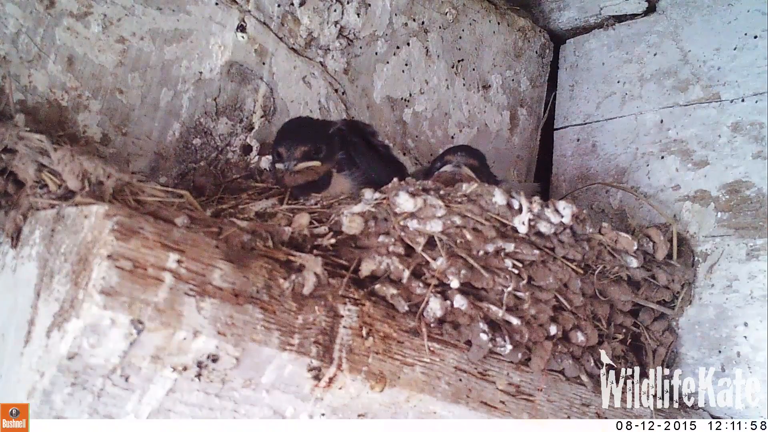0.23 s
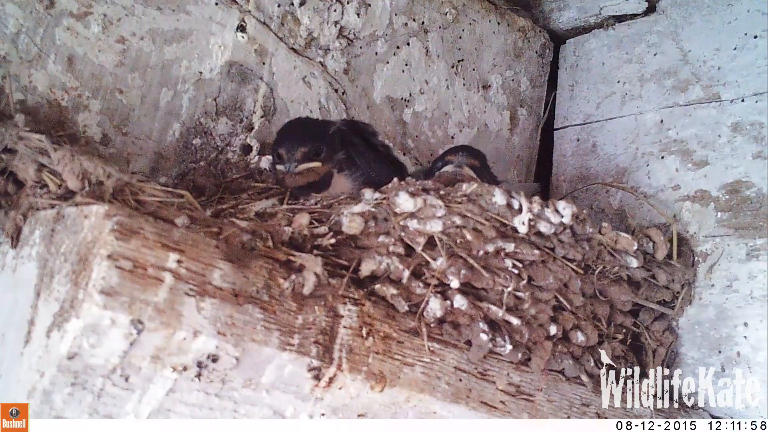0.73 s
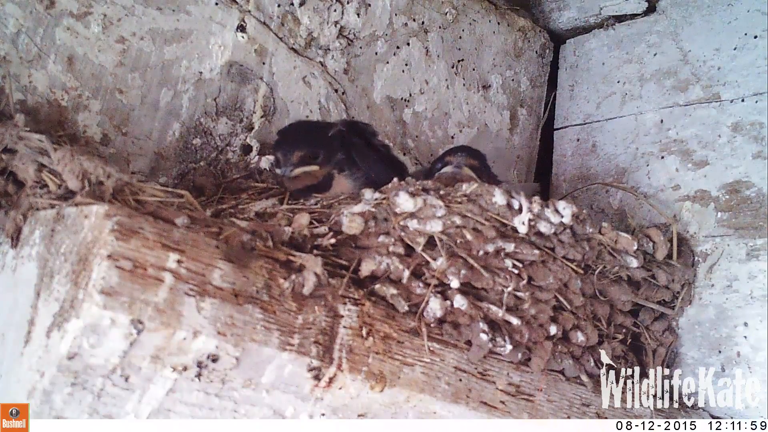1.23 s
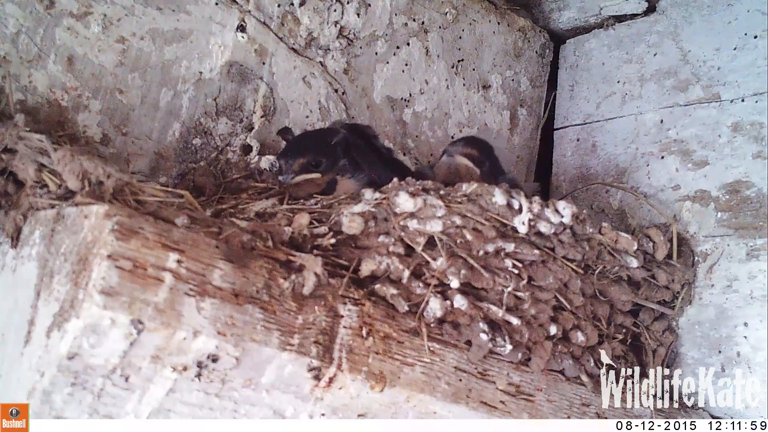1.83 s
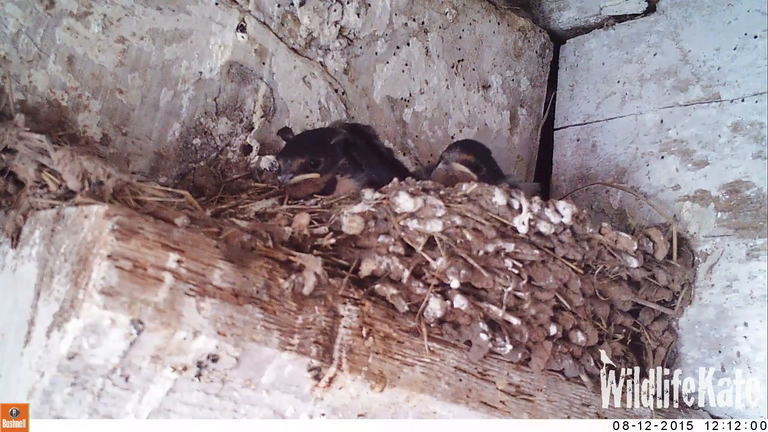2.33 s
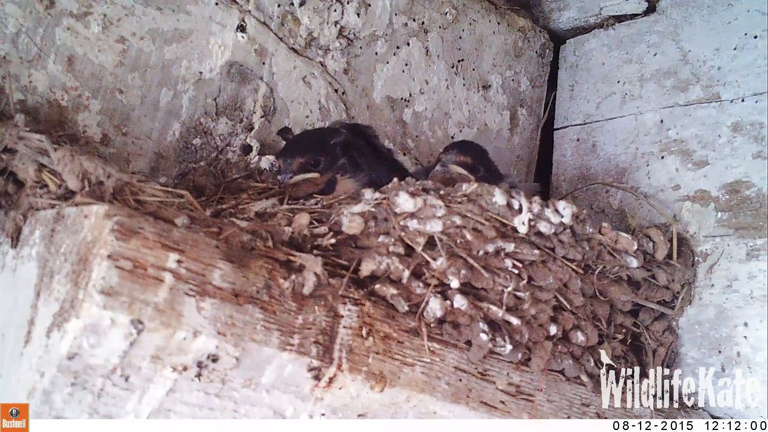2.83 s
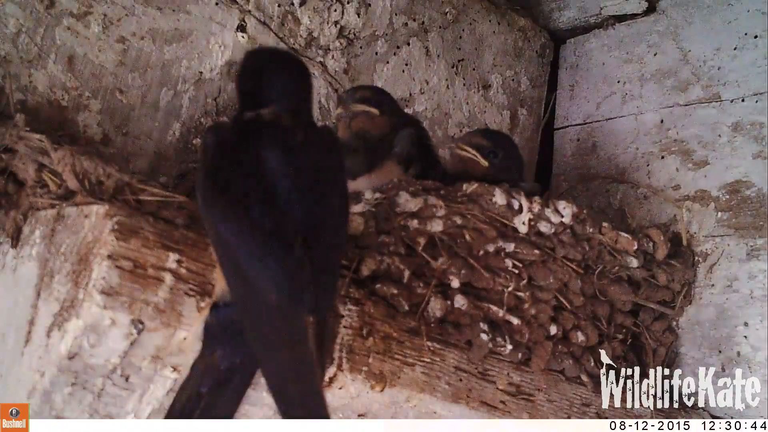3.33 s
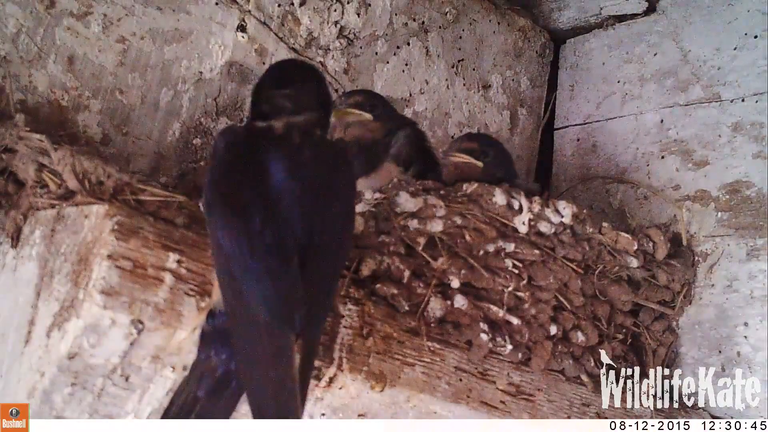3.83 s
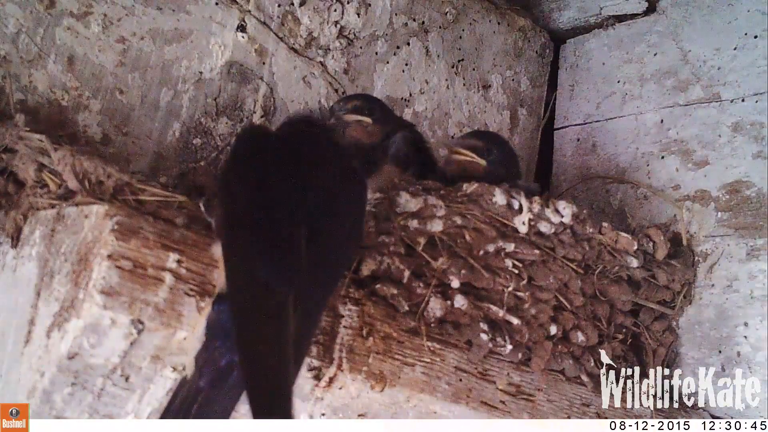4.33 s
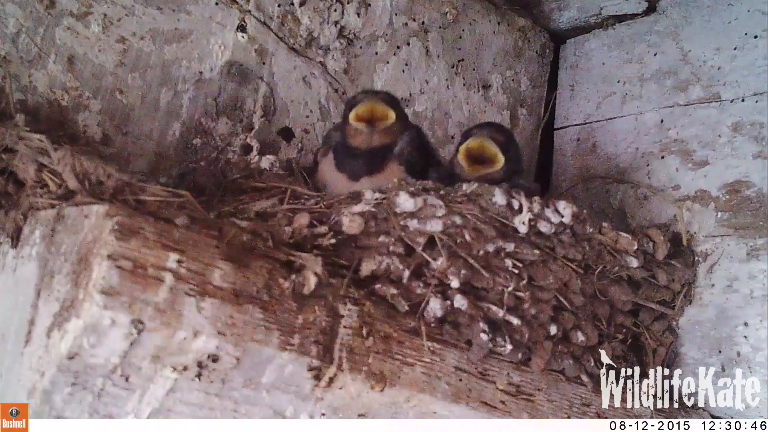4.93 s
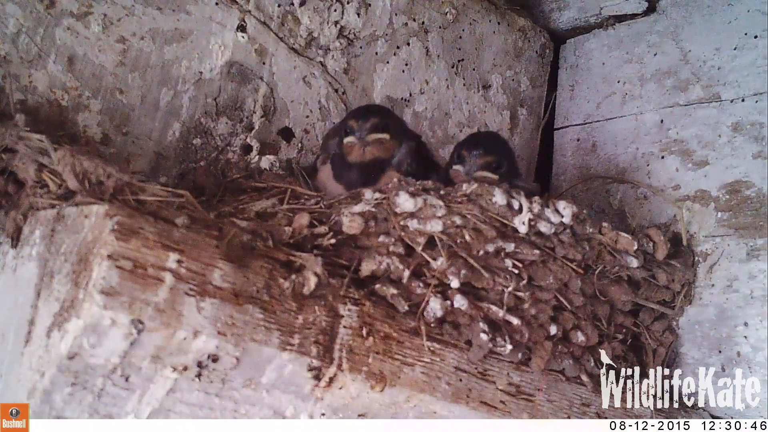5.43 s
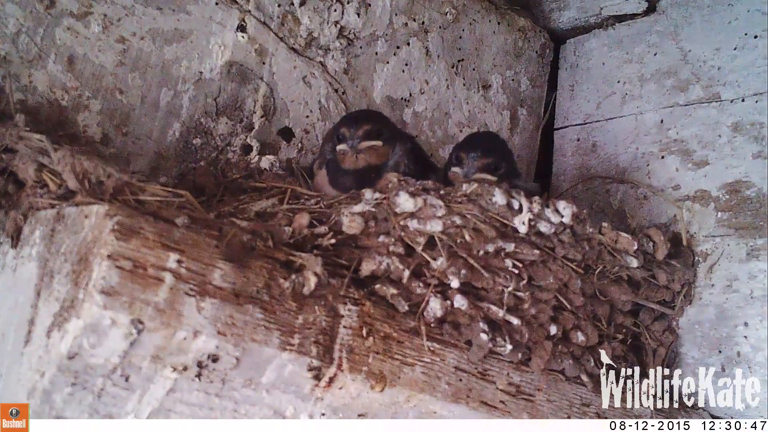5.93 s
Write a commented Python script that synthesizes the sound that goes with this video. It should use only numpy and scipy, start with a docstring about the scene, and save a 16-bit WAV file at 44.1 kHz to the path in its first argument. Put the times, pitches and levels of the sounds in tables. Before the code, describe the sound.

Swallow chicks in a garage nest give soft, hoarse chirps and thin peeps over low rumble and faint hiss. The sound cuts out for an instant and returns quietly, then jumps up as the chicks beg in loud, rapid rasps mixed with a few short whistles. The parent leaves with a puff of air on the microphone and a brief wing flutter. The calls are close, with slight room echo.

```python
"""Soft, hoarse chirps and thin peeps over low rumble and faint hiss: swallow chicks in a garage mud nest.
A parent visits and they beg in loud rasps, the syrinx rattling while the beak opens.
A few clean whistles, mostly rising, cut in; the parent leaves with a puff of air and a flutter of wings.
The whole sound drops out briefly and stays low as the begging starts, then jumps back."""
import sys
import numpy as np
from scipy import signal
from scipy.fft import rfft, irfft, next_fast_len
from scipy.io import wavfile
from scipy.ndimage import map_coordinates

SR = 44100
rng = np.random.default_rng(int(sys.argv[2]) if len(sys.argv) > 2 else 0)


def waveform_to_disk(signal):
    """Save audio, clipped to [-1, 1], as 16-bit WAV at the path in sys.argv[1]."""
    frames = np.transpose(np.atleast_2d(signal))
    scaled = np.clip(frames, -1, 1) * 32767
    samples = np.round(scaled).astype(np.int16)
    wavfile.write(sys.argv[1], SR, samples)


N = 273067

# the dropout: silent from t/s, low from t/s, full again t/s
DROPOUT = (2.908, 2.935, 3.52)


def amp(db):
    """Decibels to gain."""
    return 10 ** (np.asarray(db) / 20)


def unit(x):
    """x scaled to rms 1."""
    return x / np.sqrt(np.mean(x ** 2) + 1e-20)


def along(points, hz):
    """A curve of (f/Hz, value) points, read on a log frequency axis."""
    freqs, values = np.transpose(points)
    return np.interp(np.log(hz + 1), np.log(freqs + 1), values)


def wobble(rate, size):
    """A smooth random curve with rate knots a second."""
    knots = rng.standard_normal(int(size * rate / SR) + 4)
    return map_coordinates(knots, [np.arange(size) * rate / SR])


def filtered(x, response):
    """Equalise x with a gain given as a function of frequency."""
    padded = next_fast_len(len(x) + 8192)
    return irfft(rfft(x, padded) * response(np.fft.rfftfreq(padded, 1 / SR)), padded)[:len(x)]


def noise(response, size):
    """Coloured noise of rms 1."""
    return unit(filtered(rng.standard_normal(size), response))


def resonance(centre_hz, width_hz):
    """The gain of a resonance with steep skirts."""
    return lambda hz: 1 / (1 + (2 * (hz - centre_hz) / width_hz) ** 2)


def wavering(hz, size, drift, jitter):
    """A tone of rms 1 whose pitch drifts slowly and trembles fast."""
    pitch = hz * (1 + drift * wobble(60.3, size) + jitter * wobble(895.6, size))
    return np.sqrt(2) * np.sin(2 * np.pi * np.cumsum(pitch) / SR)


def gate(t, length, attack, release):
    """A smooth start and stop of a note."""
    fade_in = np.clip(t / attack, 0, 1)
    fade_out = np.clip((length - t) / release + .5, 0, 1)
    return np.sin(np.pi / 2 * fade_in * fade_out) ** 2


def add(track, start, sound):
    """Mix a sound into the track at start seconds."""
    part = track[round(start * SR):][:len(sound)]
    part += sound[:len(part)]


def background():
    """A bed of rumble and hiss; a narrow band of hiss joins from the dropout on."""
    # spectrum of the bed: f/Hz, relative level/dB
    spectrum = [(8, -9), (16, 4.5), (28, -3.5), (50, -11), (120, -16), (250, -24.5), (500, -32.5),
                (1000, -41.5), (2300, -49), (4000, -51.5), (7000, -55.5), (14000, -57)]
    bed = amp(-47.5 + 0.66 * wobble(4.93, N)) * noise(lambda hz: amp(along(spectrum, hz)), N)
    late = np.arange(N) / SR > DROPOUT[0]
    return bed + late * amp(-75) * noise(resonance(4160, 1160), N)


def garage(x):
    """Room reverb: coloured by the walls, each frequency dies at its own speed."""
    # colour of the walls: f/Hz, level/dB
    wall_colour = [(2500, -3), (3200, 2), (3650, -1), (3980, -7), (4350, 4.5), (4700, 4.5), (5250, -10),
                   (5700, 7), (7000, -7), (13000, -3.5)]
    # reverb time: f/Hz, t60/s
    decay = [(500, 0.41), (4000, 0.37), (7000, 0.22), (13000, 0.2)]
    hz, t, spectrogram = signal.stft(rng.standard_normal(SR // 2), SR, nperseg=256)
    fade_db = along(wall_colour, hz)[:, None] - 60 * t / along(decay, hz)[:, None]
    tail = signal.istft(spectrogram * amp(fade_db), SR, nperseg=256)[1]
    return signal.fftconvolve(x, tail / np.linalg.norm(tail))[:N]


def corner_echoes(x, t60=.11):
    """Dense early echoes from the walls and roof around the nest."""
    t = np.arange(SR // 8) / SR
    echoes = rng.standard_normal(len(t)) * amp(-60 * t / t60) * (t > .002)
    return signal.fftconvolve(x, echoes / np.linalg.norm(echoes))[:N]


def corner_ring(x, t60=.15):
    """A few pitches linger in the corner after each loud call."""
    # modes of the corner behind the nest: f/Hz, level/dB
    modes = [(3250, -3), (3850, -4), (4600, -7), (4910, 0.5)]
    t = np.arange(SR // 4) / SR
    ring = sum(amp(db - 60 * t / t60) * np.sin(2 * np.pi * hz * t) for hz, db in modes)
    return signal.fftconvolve(x, ring / np.linalg.norm(ring))[:N]


def soft_chirps(length_s=0.054):
    """Hoarse chirps through a nearly shut beak: one resonance that swells and fades."""
    # chirp cues: peak t/s, level/dB, centre f/Hz
    chirps = [(.209, -64, 3500), (.292, -61, 4030), (.405, -64, 4000), (.659, -67.5, 4300),
              (.712, -59.5, 4120), (.98, -68.5, 3430), (1.069, -69.5, 3860), (1.172, -72, 3800),
              (1.664, -70.5, 4300), (1.719, -65.5, 4180), (2.033, -71.5, 3500), (2.562, -62, 4000),
              (2.891, -68.5, 4230), (4.574, -59.5, 3850)]
    # colour shared by all chirps: f/Hz, level/dB
    colour = [(2400, -3), (3000, -3), (3600, 1), (4600, -1), (5000, -7), (5700, -4.5)]
    out, t = np.zeros(N), np.arange(SR // 4) / SR
    middle = t.mean()
    for peak, db, centre_hz in chirps:
        swell = np.exp(-2 * ((t - middle) / length_s) ** 2) * amp(1.5 * wobble(90.3, len(t)))
        width_hz = 1620 * 2 ** ((db + 63) / 24)  # 24 dB louder is twice as broad
        beak = lambda hz: resonance(centre_hz, width_hz)(hz) * amp(along(colour, hz))
        add(out, peak - middle, amp(db) * swell * noise(beak, len(t)))
    return out


def peeps(length_s=0.082, rise_hz_per_s=2580):
    """Now and then the soft voice holds a shaky, gently rising pitch."""
    # peep cues: start t/s, first f/Hz, level/dB
    cues = [(.359, 3870, -68), (1.03, 3920, -69), (1.13, 3730, -72), (1.16, 4300, -78), (1.4, 3900, -80),
            (1.42, 2910, -82), (1.64, 4480, -78), (1.955, 4020, -77), (2.0, 3180, -74), (2.02, 4500, -78),
            (2.53, 4390, -73)]
    out, t = np.zeros(N), np.arange(int(length_s * SR)) / SR
    for start, first_hz, db in cues:
        tone = wavering(first_hz + rise_hz_per_s * t, len(t), drift=.01, jitter=.034)
        add(out, start, amp(db) * np.sqrt(np.hanning(len(t))) * tone)
    return out


def wings(takeoff_s=5.02, wingbeat_s=0.06, strokes=4):
    """The parent speeds away: each stroke thumps the microphone with air, then the feathers swish."""
    # spectrum of the puff of air: f/Hz, relative level/dB
    puff = [(10, -1.5), (25, 6.5), (50, -9), (100, -27), (300, -48), (1000, -100)]
    push_s, swish_s, swish_lag_s = 0.021, 0.024, 0.049
    stroke = np.arange(strokes)[:, None]
    since = np.arange(N) / SR - takeoff_s - wingbeat_s * stroke
    pushes = amp(-31 - 2 * stroke ** 2) * np.exp(-(since / push_s) ** 2)
    swishes = amp(-60.5 - 3.5 * stroke) * np.exp(-((since - swish_lag_s) / swish_s) ** 2)
    air = pushes.sum(axis=0) * noise(lambda hz: amp(along(puff, hz)), N)
    feathers = swishes.sum(axis=0) * noise(resonance(4000, 12500), N)
    return air + feathers


def whistles():
    """Short slurs: the throat favours the second harmonic until the pitch climbs and the first leads."""
    # whistle cues: start t/s, end t/s, first f/Hz, last f/Hz, mid-note level/dB, swell/dB
    notes = [(3.876, 3.92, 2593, 2790, -39.5, 3), (3.918, 3.933, 2840, 3230, -36.5, -1),
             (4.008, 4.022, 2780, 2830, -38, -8), (4.026, 4.074, 2927, 3390, -44.5, -11),
             (4.535, 4.559, 3020, 2855, -43.5, 12), (4.563, 4.605, 2985, 3280, -40, 7.5),
             (4.686, 4.728, 2837, 3035, -37.5, -0.5)]
    # the throat's weighting of the harmonics: f/Hz, level/dB
    colour = [(2750, -20.5), (3000, -9.5), (3200, -10.5), (5300, -2), (5850, 1), (6400, -9), (7600, -25),
              (9200, -23), (12000, -55)]
    out = np.zeros(N)
    for start, end, first_hz, last_hz, db, swell_db in notes:
        length = end - start
        t = np.arange(int((length + .004) * SR)) / SR
        progress = np.clip(t / length, 0, 1)
        pitch = first_hz + (last_hz - first_hz) * progress ** 2.1  # holds, then bends ever faster
        waver = 1 + 0.015 * wobble(686, len(t)) + 0.0038 * wobble(115, len(t))
        phase = 2 * np.pi * np.cumsum(pitch * waver) / SR
        tone = sum(amp(along(colour, k * pitch)) * np.sin(k * phase) for k in range(1, 5))
        tremor = amp(1.4 * wobble(143, len(t)))
        husk = amp(-20.5) * noise(resonance(5500, 4000), len(t))
        envelope = amp(db + swell_db * (progress - .5)) * gate(t, length, attack=0.0026, release=0.0091)
        add(out, start, (unit(tone) * tremor + husk) * envelope)
    return out


def rasp(length, crescendo_db, last_gape, first_gape=0.18):
    """One begging call: the syrinx rattles chaotically, harder and harder, while the beak moves."""
    # throat and beak resonances: f/Hz, width/Hz, level/dB, change with the beak wide open/dB
    throat = [(1980, 520, -34.5, -5), (2560, 800, -21.5, 3.5), (3520, 730, -9, 2.5), (3973, 554, 2, -1.5),
              (4770, 490, -5, 1), (5177, 650, -4, 0.5), (5900, 600, -27, 11.5), (6837, 890, -18.5, 19),
              (8320, 630, -23, 21), (10200, 980, -32.5, 13.5), (12550, 550, -42.5, 20),
              (13850, 400, -46, 18)]
    size = int((length + 0.011) * SR)
    t = np.arange(size) / SR
    progress = np.clip(t / length, 0, 1)
    gape = first_gape + (last_gape - first_gape) * progress ** 3.3  # nearly shut until late in the call
    voice = np.zeros(size)
    for hz, width_hz, db, open_db in throat:
        # each resonance carries hiss and a wavering partial that comes and goes
        partial = amp(-1.5 + 3.14 * wobble(89.3, size)) * wavering(hz, size, drift=.019, jitter=.017)
        hiss = noise(resonance(hz, width_hz), size)
        voice += amp(db + open_db * gape) * np.sqrt(width_hz) * unit(hiss + partial)
    # a narrow dip around 1.5 kHz, just below the throat's lowest resonance
    voice = filtered(voice, lambda hz: amp(along([(1100, -1), (1500, -8.0), (1900, 1)], hz)))
    flutter = amp(0.5 * wobble(142.6, size) + 0.78 * wobble(700, size))
    effort = amp(crescendo_db * (progress - 1))
    return unit(voice * flutter) * effort * gate(t, length, attack=0.006, release=0.017)


def begging(excitement_db_per_s=1.57):
    """The chicks beg about five times a second, a little louder each time."""
    # begging cues: start t/s, end t/s, crescendo/dB, last beak opening (0-1)
    calls = [(2.972, 3.119, 8.5, 0.7), (3.205, 3.338, 9, 0.35), (3.445, 3.583, 9.5, 0.67),
             (3.647, 3.773, 7.5, 0.44), (3.885, 4.004, 10.5, 0.4), (4.078, 4.204, 8, 0.96),
             (4.281, 4.399, 11.5, 0.07), (4.726, 4.833, 16.5, 0.91), (4.881, 4.993, 8, 0.99)]
    out = np.zeros(N)
    for start, end, crescendo_db, last_gape in calls:
        level = amp(-30 + excitement_db_per_s * (start - calls[0][0]))
        add(out, start, level * rasp(end - start, crescendo_db, last_gape))
    return out


def scene():
    """Loud calls sit close and fairly dry; the soft voices carry more of the room."""
    begs, slurs, soft = begging(), whistles(), soft_chirps() + peeps()
    near = begs + amp(-13.0) * corner_echoes(begs)
    near += amp(-17.5) * garage(begs) + amp(-25.5) * corner_ring(begs)
    clear = slurs + amp(-21.5) * garage(slurs)
    far = amp(0.5) * soft + amp(-6.5) * garage(soft)
    return (near + clear + far + wings() + background())[None]


def record(dry):
    """The level cuts out, stays low for a moment and jumps back; nothing passes above 14.1 kHz."""
    t = np.arange(N) / SR
    level = np.select([t < edge for edge in DROPOUT], [1, 0, amp(-24.0)], 1)
    return filtered(dry[0] * level, lambda hz: hz < 14100)[None]


dry = scene()
out = record(dry)
waveform_to_disk(out)
```